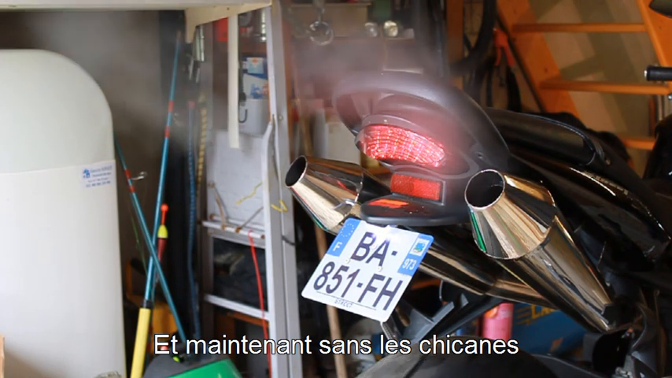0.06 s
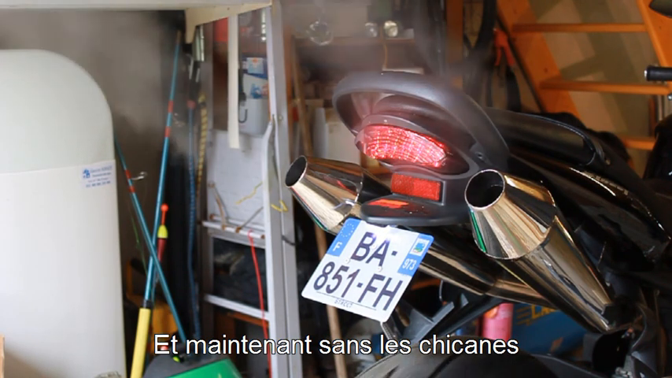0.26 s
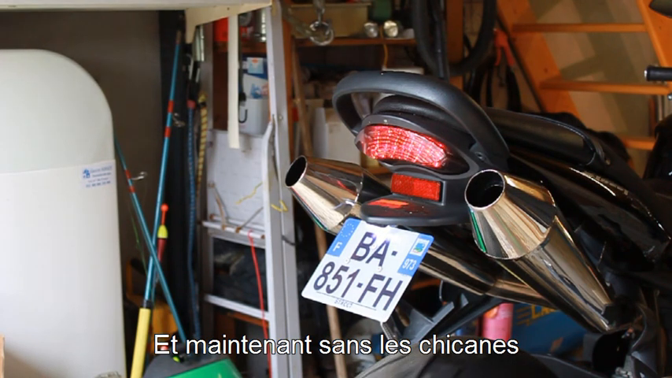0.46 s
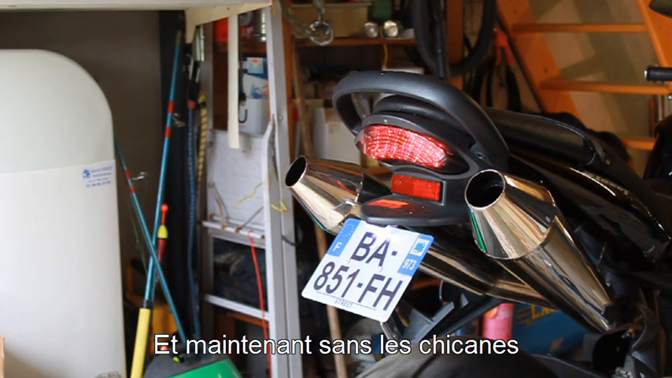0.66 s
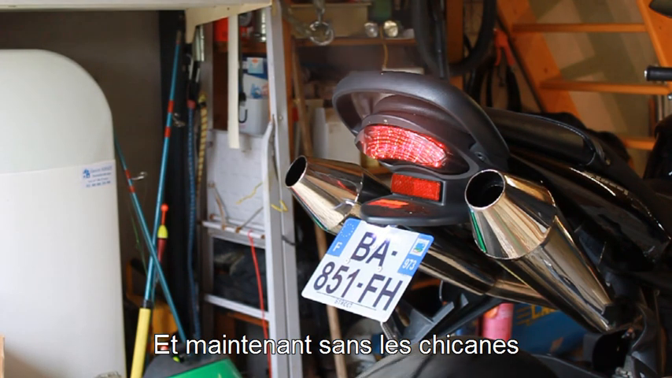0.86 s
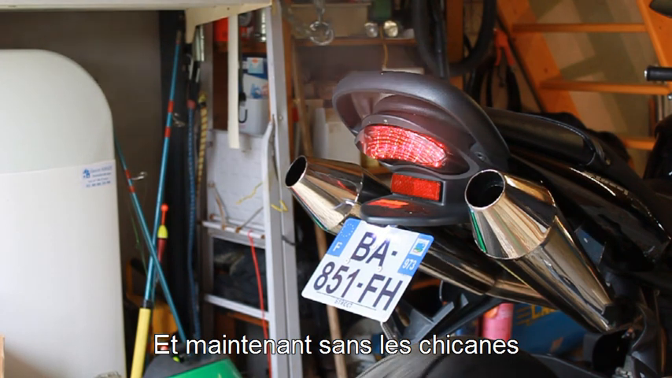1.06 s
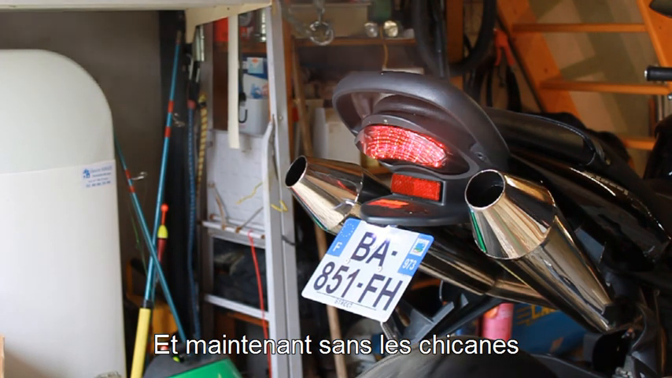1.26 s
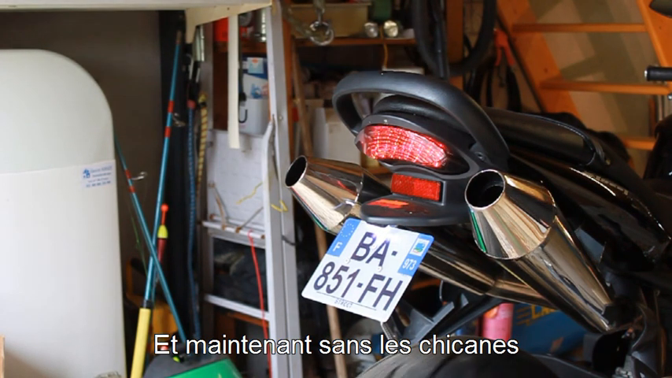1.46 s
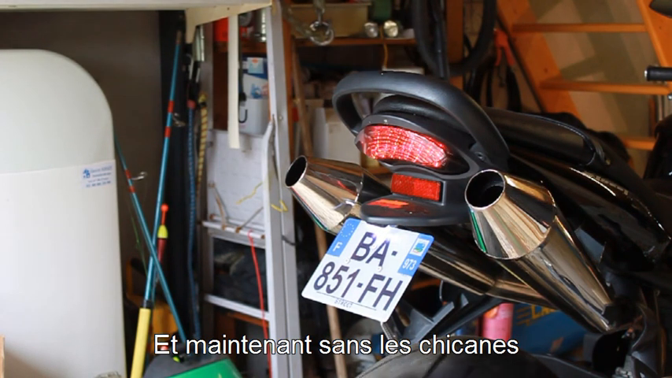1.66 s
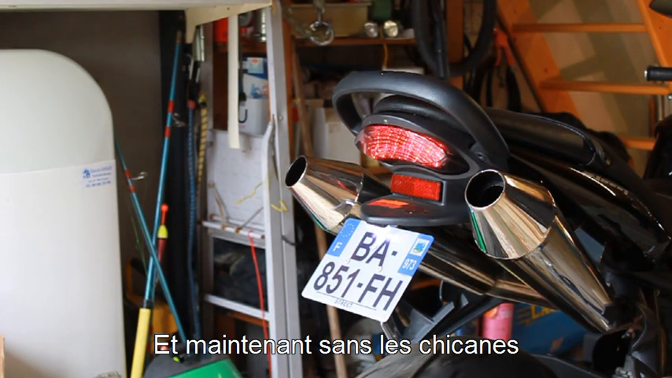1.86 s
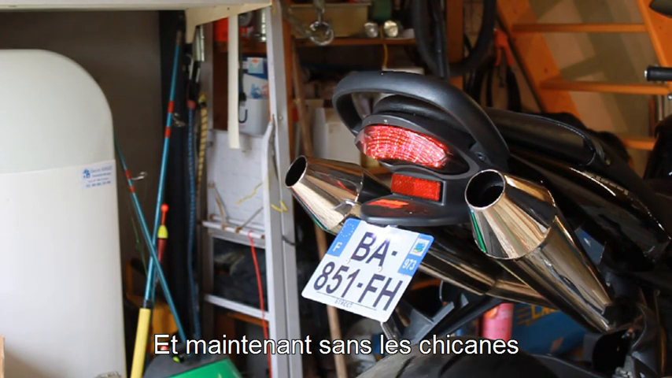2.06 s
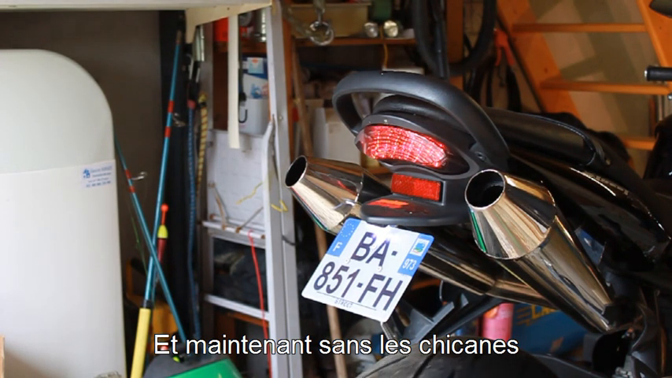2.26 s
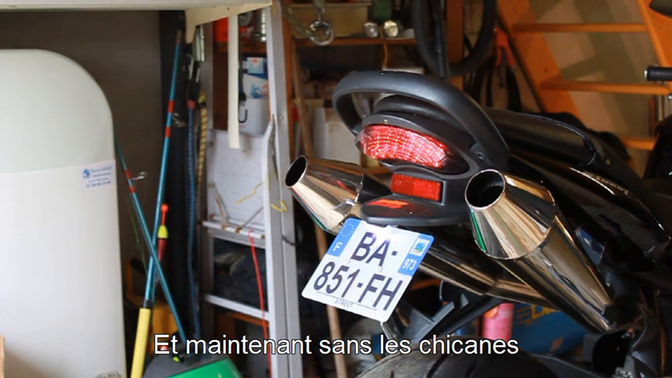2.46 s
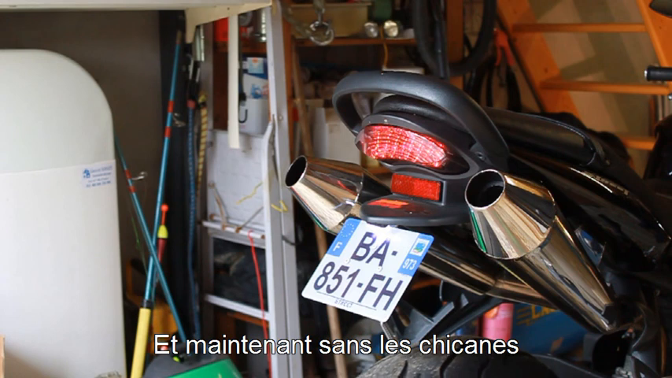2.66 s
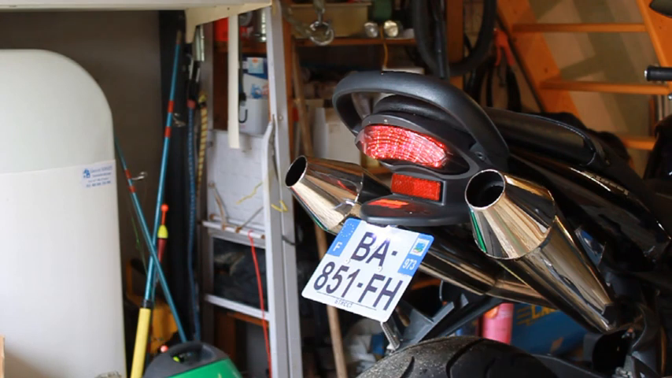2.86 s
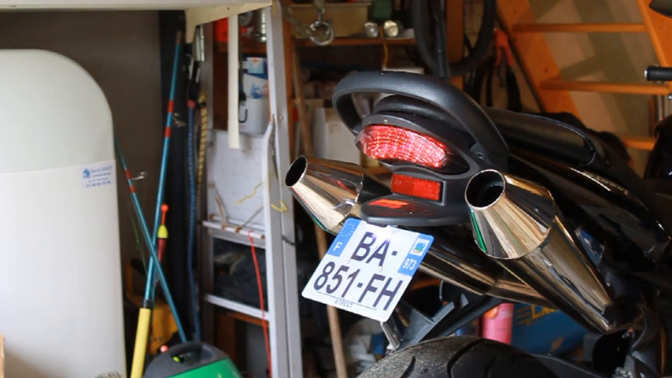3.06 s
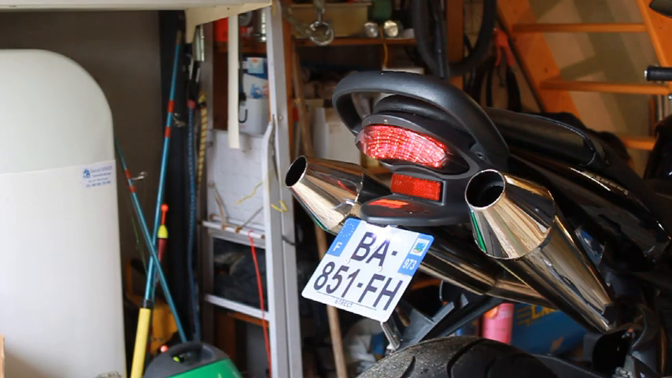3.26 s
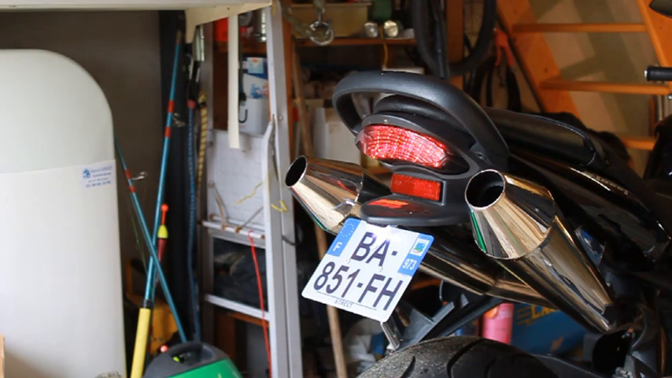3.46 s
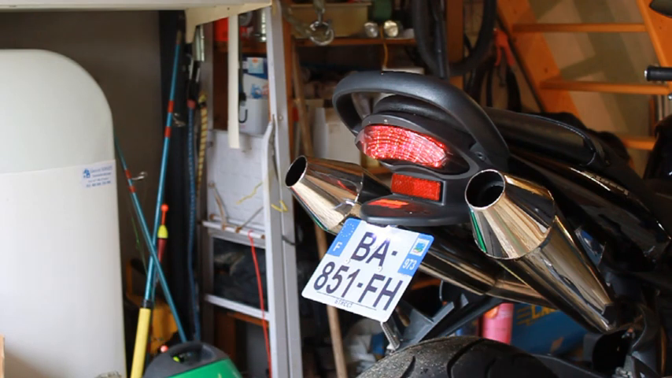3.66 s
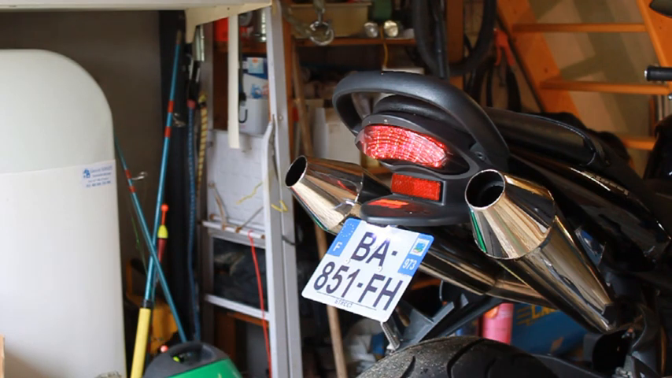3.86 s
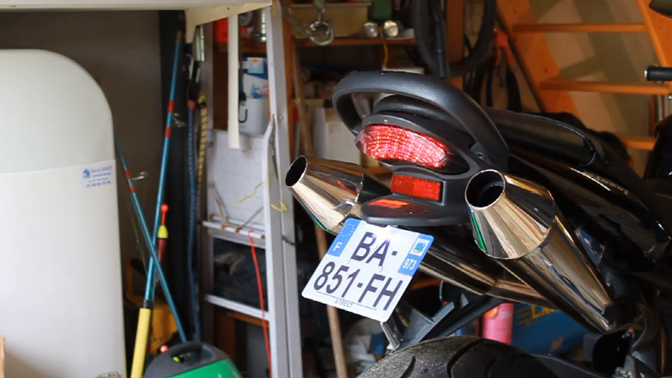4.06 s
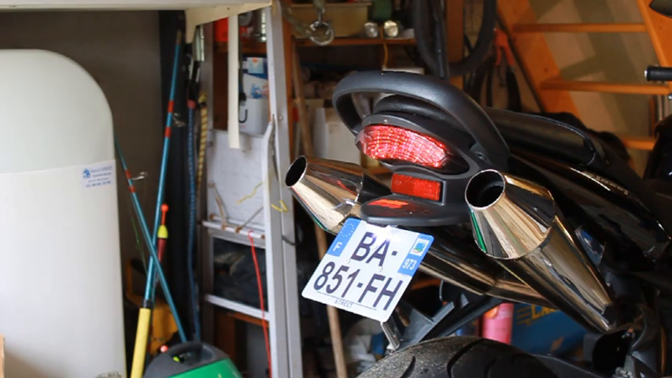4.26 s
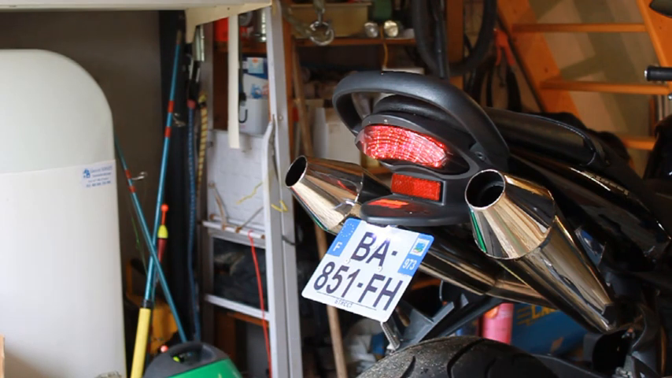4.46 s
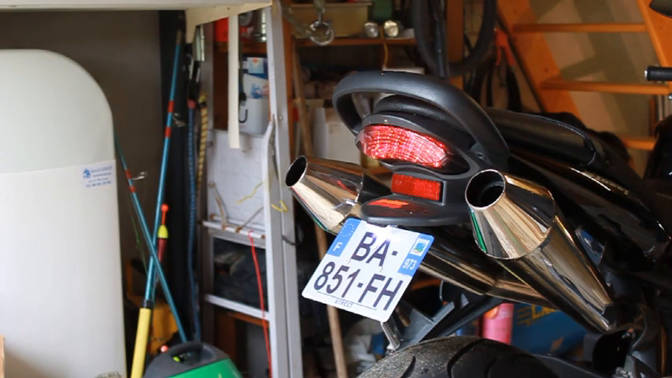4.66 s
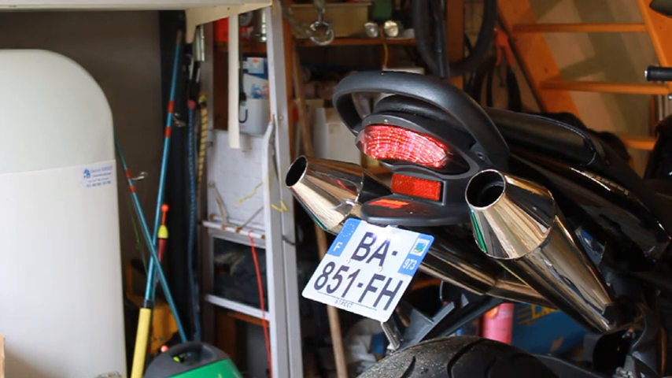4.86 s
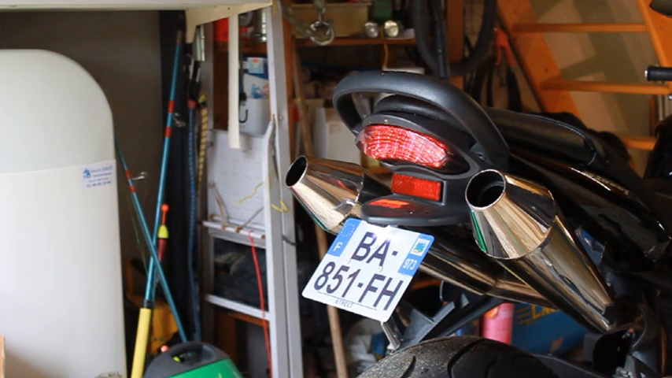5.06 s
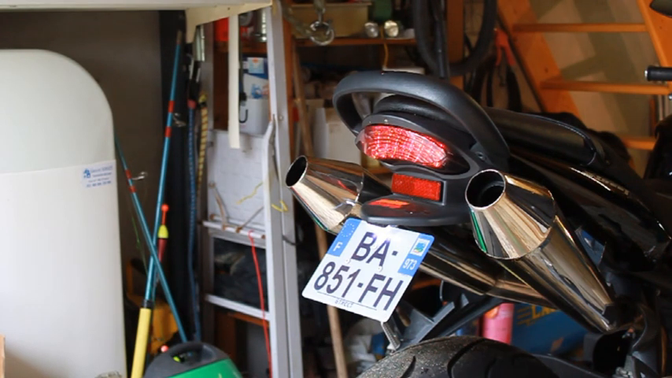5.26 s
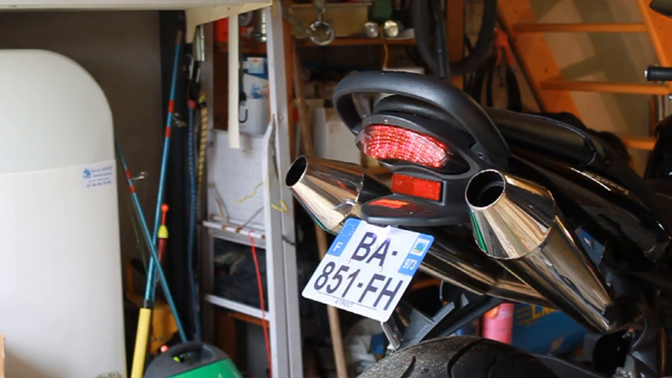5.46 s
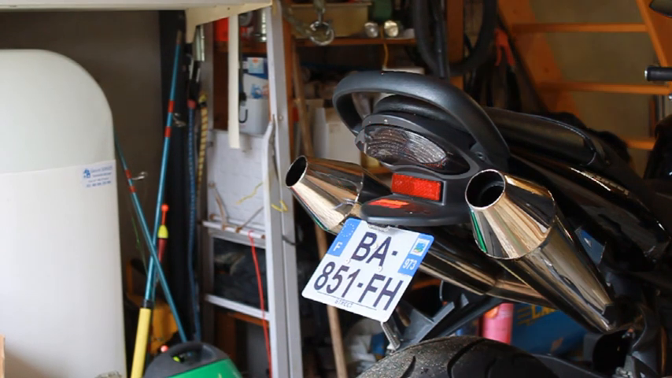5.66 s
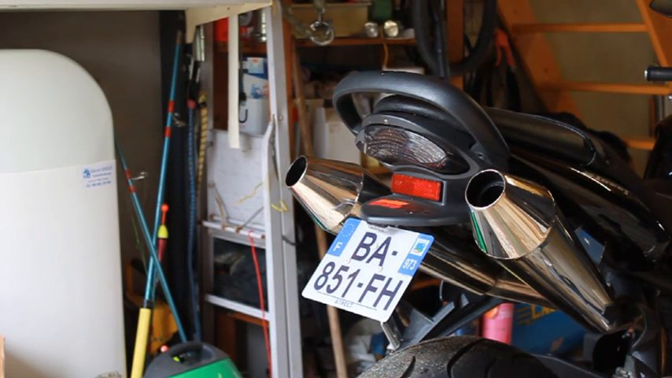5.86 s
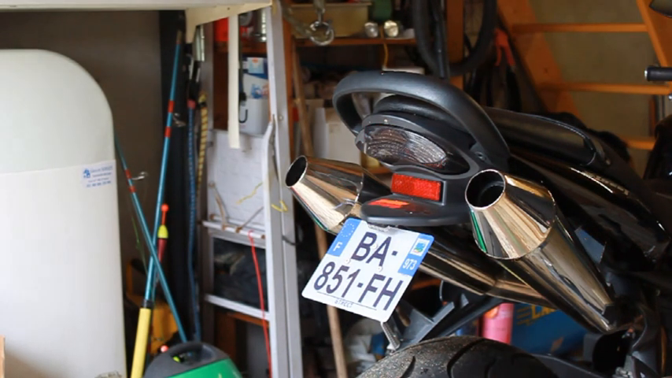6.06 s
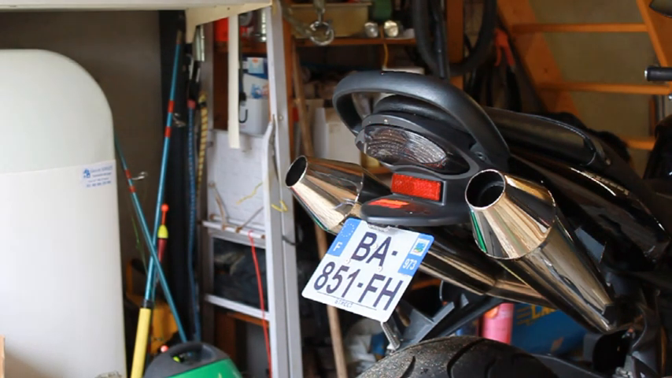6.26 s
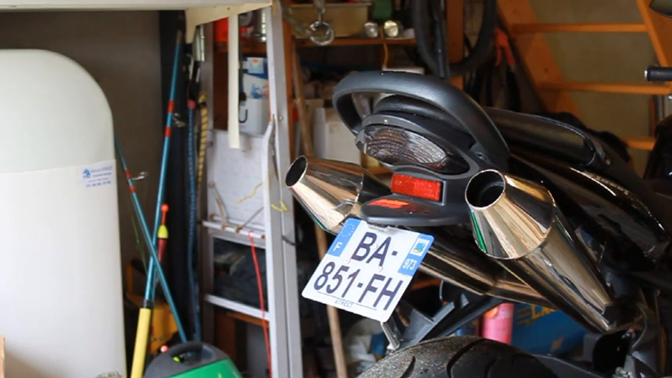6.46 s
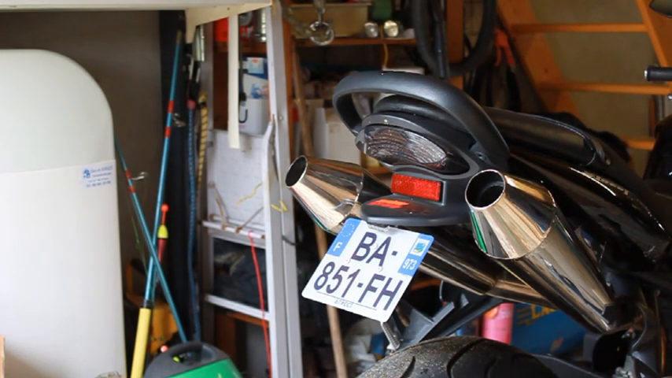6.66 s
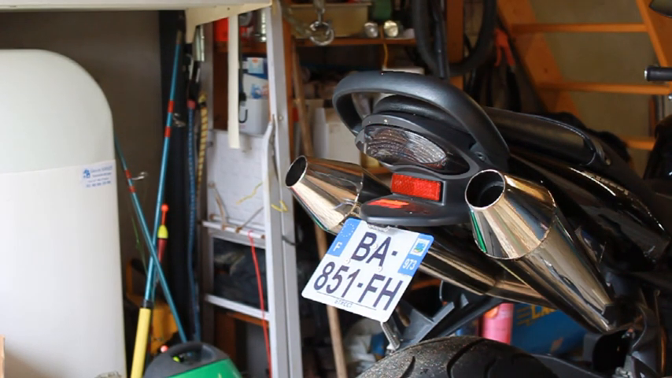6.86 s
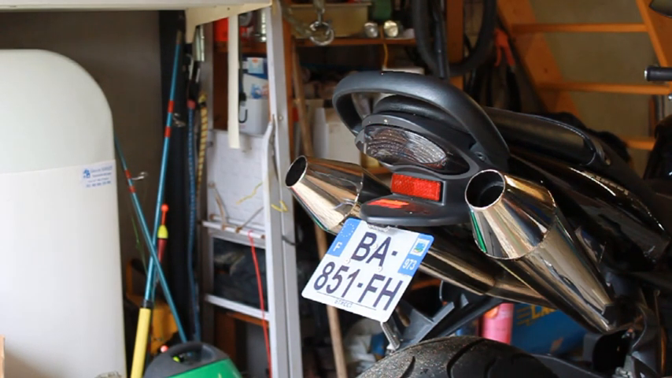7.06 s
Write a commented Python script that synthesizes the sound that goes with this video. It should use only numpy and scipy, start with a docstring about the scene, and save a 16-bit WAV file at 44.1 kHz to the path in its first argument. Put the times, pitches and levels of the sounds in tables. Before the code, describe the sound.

Close behind a three-cylinder motorcycle in a reverberant garage, a falling rev is blipped up to a loud, raspy saw-like howl. The note sinks, backfires snap in the open pipes, and separate pulses settle into a deep hunting idle with hissing gas and gear whine. The ignition is cut, the drive clatters briefly, then soft cloth rustle and a tiny tap in near silence. A small microphone saturates on peaks.

```python
"""A three-cylinder motorcycle with open pipes revs up in a garage: its firings merge into a saw-like note.
The speed falls, backfires pop in the pipes, and single exhaust pulses burble down to a hunting idle.
Rushing gas (shaped noise) and meshing gears (narrow noise bands) follow the speed. The ignition is cut,
the drive clatters (decaying noise) as the crank stops; then cloth rustles and something small is set down
in the quiet garage, over a faint hum of narrow resonances."""
import sys
import numpy as np
from scipy import signal
from scipy.fft import rfft, irfft
from scipy.io import wavfile
from scipy.ndimage import uniform_filter1d

SR = 44100
rng = np.random.default_rng(int(sys.argv[2]) if len(sys.argv) > 2 else 0)


def materialize(psi):
    """Save the field psi as 16-bit PCM at rate SR to the path in sys.argv[1].

    A 1-D psi becomes a single channel; in a 2-D psi each row is a channel.
    """
    bounded = np.clip(np.atleast_2d(psi).T, -1, 1)
    quanta = np.round(bounded * 32767).astype(np.int16)
    wavfile.write(sys.argv[1], SR, quanta)


N = 313530
T = np.arange(N) / SR  # time (s)

# The idle speed hunts a little. Each row: time [s], firing rate [firings per s].
IDLE_SPEED = [(2.1, 35.4), (2.23, 34.2), (2.34, 35.2), (2.46, 34.5), (2.75, 34.5), (2.99, 35.3),
              (3.11, 34.8), (3.23, 35.9), (3.65, 34.4), (3.73, 35.6), (3.85, 35.9), (3.97, 35.0),
              (4.21, 35.0), (4.3, 34.5), (4.53, 34.7), (4.61, 35.3), (4.85, 35.8), (4.97, 35.0),
              (5.14, 34.7), (5.28, 35.4), (5.4, 33.9), (5.44, 34.1), (5.53, 36.2), (5.62, 36.4)]
IDLE_HZ = 35  # reference firing rate at idle
OFF_S, STILL_S = 5.62, 5.8  # ignition cut; crank at rest


def amp(db):
    """Level in decibels to amplitude ratio."""
    return 10 ** (np.asarray(db) / 20)


def evened(x):
    """Normalisation to unit root-mean-square."""
    return x / np.sqrt(np.mean(x ** 2) + 1e-20)


def read(points, hz):
    """Interpolation of a spectrum along a logarithmic frequency axis."""
    f, value = np.transpose(points)
    return np.interp(np.log(hz + 1), np.log(f + 1), value)


def curves(*tables):
    """Piecewise linear time courses of the columns after the time column."""
    s, *columns = np.transpose(np.vstack(tables))
    return [np.interp(T, s, c) for c in columns]


def bumps(rows):
    """Sum of Gaussian bells from rows of (time s, length s, height)."""
    return sum(height * np.exp(-(2 * (T - s) / length) ** 2) for s, length, height in rows)


def resonate(x, hz, width):
    """Resonance of peak gain 1 by heterodyning: shifts hz down to zero, smooths, shifts back."""
    turn = np.exp(2j * np.pi * np.cumsum(hz * np.ones(len(x))) / SR)
    r = np.exp(-np.pi * width / SR)
    return 2 * (turn * signal.lfilter([1 - r], [1, -r], x / turn)).real


def noise(spectrum):
    """Stationary noise: white noise weighted by a spectral density."""
    weight = amp(read(spectrum, np.fft.rfftfreq(N, 1 / SR)))
    return evened(irfft(rfft(rng.standard_normal(N)) * weight, N))


def flutter(size):
    """Slow random modulation: white noise averaged over a number of samples."""
    return evened(uniform_filter1d(rng.standard_normal(N), size=size))


def clicks(rows):
    """Unit impulses scaled by level, from rows of (time s, level dB)."""
    x = np.zeros(N)
    s, db = np.transpose(rows)
    x[(s * SR).astype(int)] = amp(db)
    return x


def colour(x, points):
    """Minimum-phase filter: the phase is the Hilbert transform of the log gain."""
    log_gain = np.log(amp(read(points, abs(np.fft.fftfreq(2 ** 14, 1 / SR)))))
    response = np.exp(log_gain - 1j * signal.hilbert(log_gain).imag)
    taps = np.fft.ifft(response).real[:2 ** 12]
    return signal.oaconvolve(x, taps / np.linalg.norm(taps))[:N]


def swept(x):
    """Dispersion: group delay rises with pitch, so each stroke sweeps upward."""
    hz = np.fft.rfftfreq(N, 1 / SR)
    late = .011 * np.minimum(hz / 400 - .5, 1)  # s; level above 600 Hz
    return irfft(rfft(x) * np.exp(-2j * np.pi * np.cumsum(late) * hz[1]), N)


def quiet():
    """Room background: friction noise of cloth, a hum of narrow resonances, a noise floor, a steady noise wash."""
    # Cloth rustling near by. Each row: time in seconds, length in seconds, level in dB.
    rustles = [(6.328, 0.027, -65.5), (6.4, 0.073, -63), (6.523, 0.092, -57.5), (6.96, 0.076, -61),
               (7.02, 0.041, -64), (7.072, 0.06, -55)]
    # Spectrum of the rustle. Each row: frequency in Hz, relative density in dB per Hz.
    rustle_colour = [(30, -24), (100, -12), (400, 4.5), (1000, -4), (3000, -5), (8000, -14), (16000, -13)]
    # Partials of the hum. Each row: frequency in Hz, relative level in dB.
    hum_partials = [(226.1, -71), (360.7, -70), (403.7, -72), (586.8, -66), (672.9, -70), (1039, -77),
                    (1400, -84)]
    # Spectrum of the noise floor. Each row: frequency in Hz, relative density in dB per Hz.
    floor_colour = [(20, -2.5), (60, -5), (300, -14), (1500, -12.5), (16000, -38.5)]
    bed_db, floor_db = -68, -68
    # steady noise wash with the rustle's colour: constant level until 5.85 s, then dying away
    wash_db, wash_dies_s, wash_db_per_s = -44.5, 5.85, -150
    hum_db, hum_from_s, hum_rise_s = -60.5, 6.7, 0.085

    rustle = amp(bed_db) + bumps([(s, length, amp(db)) for s, length, db in rustles])
    rustle += amp(wash_db + wash_db_per_s * np.maximum(T - wash_dies_s, 0))
    swell = amp(hum_db) / (1 + np.exp((hum_from_s - T) / hum_rise_s))
    hum = sum(amp(db) * evened(resonate(rng.standard_normal(N), hz, 4.7)) for hz, db in hum_partials)
    return rustle * noise(rustle_colour) + swell * evened(hum) + amp(floor_db) * noise(floor_colour)


def garage(x):
    """Diffuse reverberation: a noise tail whose bands decay exponentially, each at its own speed."""
    # Reverberation of the garage. Each row: frequency in Hz, time to fall by 60 dB in seconds.
    decay_times = [(100, 0.75), (500, 0.68), (2000, 0.37), (8000, 0.44)]
    hz, t, z = signal.stft(rng.standard_normal(SR), SR, nperseg=256)
    decay = amp(-60 * t / read(decay_times, hz)[:, None])
    tail = signal.istft(z * decay, SR, nperseg=256)[1]
    return signal.oaconvolve(x, tail / np.linalg.norm(tail))[:N]


def clatter():
    """Impact excitation: slack in the drive knocks the casing, a bright crack and a short jangle each."""
    # Backlash blows. Each row: time in seconds, relative level in dB.
    blow_rows = [(5.808, -20), (5.813, -1.5), (5.829, -35), (5.844, -15), (5.859, -12), (5.88, -11),
                 (5.894, -22), (5.909, -43)]
    # Something small is set down. Each row: time in seconds, relative level in dB.
    tap_rows = [(7.027, -30)]
    # Spectrum of the casing. Each row: frequency in Hz, relative density in dB per Hz.
    casing_colour = [(250, -30), (800, -14), (1100, -7), (1500, 0), (2600, 0), (3500, -7), (4600, -11),
                     (6000, -19), (10000, -24), (16000, -34)]

    t = np.arange(4000) / SR
    blows = clicks(blow_rows) + clicks(tap_rows)
    jangle_shape = amp(-16.0 - 60 * t / 0.12) * (1 - np.exp(-t / 0.0039))
    jangle = signal.oaconvolve(blows, jangle_shape)[:N] * noise(casing_colour)
    jangle *= amp(2.2 * flutter(90))  # loose parts chatter
    crack_shape = amp(-27 - 60 * t / .05) * (1 - np.exp(-t / .003))
    crack = signal.oaconvolve(blows, crack_shape)[:N]
    return jangle + crack * rng.standard_normal(N)


def gears(rate, cycles):
    """Mesh tones: fuzzy whines at multiples of the firing rate, amplitude-modulated by the firings."""
    # Level of the whine. Each row: time in seconds, level in dB.
    whine_levels = [(0, -32), (.2, -32), (.3, -44), (.85, -40), (1, -30), (1.25, -28.5), (1.5, -29.5),
                    (1.7, -32), (1.9, -33), (2.05, -40), (3, -39), (5.55, -39), (5.63, -37), (5.7, -40),
                    (5.8, -56)]
    # Gear and chain mesh. Each row: multiple of the firing rate, nominal width in Hz,
    # relative level at speed in dB, relative level at idle in dB.
    mesh = [(24.38, 16, -30, -6), (31.45, 38, -3.5, -0.5), (42.5, 30, -36.5, -13), (57.54, 28, -19, -6),
            (61.7, 61, -11, -5), (67.1, 43, -29, -6), (91.7, 84, -24, -11)]

    whine_db, = curves(whine_levels)
    fast = np.clip((rate - 38) / 8, 0, 1)  # 0 at idle, 1 at speed
    whine = 0
    for multiple, width, fast_db, idle_db in mesh:
        waver = .012 * fast * flutter(200)
        hz = rate * multiple * (1 + waver)
        spread = width * np.sqrt(np.pi / 2)
        grains = signal.lfilter([1], [1, -np.exp(-np.pi * spread / SR)], rng.standard_normal((2, N)))
        angle = 2 * np.pi * np.cumsum(hz) / SR
        line = evened(grains[0] * np.cos(angle) + grains[1] * np.sin(angle))
        treble_fade = np.clip(3 - hz / 3500, 0, 1)  # from 7 to 10.5 kHz
        whine += amp(idle_db + fast * (fast_db - idle_db)) * line * treble_fade
    throb = evened(7.8 + np.cos(np.pi * cycles) ** 2)
    return amp(whine_db) * whine * throb * (T < STILL_S)


def roar(rate, cycles):
    """Turbulent flow noise: gas rushes out in a puff with each firing and tears in bursts at speed."""
    # Spectra of the gas at speed and at idle. Each row: frequency in Hz, relative density in dB per Hz.
    speed_colour = [(180, -31.5), (300, 0.5), (593, -10), (762, -6), (856, -9.5), (1970, -8), (2400, -5),
                    (4370, -10), (13800, -24.5), (16000, -15.5)]
    idle_colour = [(250, 5.5), (450, 2), (700, -2), (1300, -7.5), (2300, 0), (3900, -6), (8000, -17.5),
                   (16000, -17.5)]
    # The roar dips or leaps briefly. Each row: time in seconds, length in seconds, change in dB.
    lulls = [(.34, 0.12, -3), (.464, 0.045, -6), (.51, 0.0092, -9.5), (.62, 0.015, 13), (.79, 0.013, -5),
             (.924, 0.046, -4), (1.1, .03, 0)]
    base_db, db_per_octave, lag_s = -36, 6.5, 0.034  # follows the speed, a little late
    settled_s, dip_db, regain_s = 1.8, -5, 0.74  # dips as idle nears and creeps back
    dies_db_per_s = -170  # after the ignition cut

    lagging = np.interp(T - lag_s, T, rate)
    roar_db = base_db + db_per_octave * np.log2(lagging / IDLE_HZ) + bumps(lulls)
    roar_db += dip_db * np.exp(-abs(T - settled_s) / regain_s)
    roar_db += dies_db_per_s * np.maximum(T - OFF_S, 0)
    puffs = evened(1.6 + np.cos(np.pi * cycles) ** 4)
    fast = np.clip((rate - 45) / 90, 0, 1)
    gas = np.sqrt(fast) * noise(speed_colour) + np.sqrt(1 - fast) * noise(idle_colour)
    bursts = flutter(700) + .3 * flutter(3000)
    crackle_db = (1.2 + 2.3 * np.clip((rate - 150) / 100, 0, 1)) * bursts
    return (T < STILL_S) * puffs * amp(roar_db + crackle_db) * gas


def note(rate, cycles):
    """Harmonic synthesis: at high revs the pulses merge into a saw-like tone that rasps under load."""
    # Load. Each row: time in seconds, throttle opening from 0 to 1.
    throttle = [(.25, .15), (.28, 1), (.6, 1), (.68, .15)]
    # First three harmonics. Each row: relative level in dB, dB added at full throttle.
    harmonics = [(-11, -1), (-20.5, 5), (-28.5, 2.5)]
    # Colour of the note. Each row: frequency in Hz, relative gain in dB.
    note_colour = [(95, -20), (140, -14.5), (170, -9), (210, -4.5), (300, -2.5), (400, 4.5), (520, -12),
                   (620, -6), (900, -5.5)]
    # Standing waves of pipes and garage swallow the note as it sweeps past.
    # Each row: frequency in Hz, width in Hz, share lost from 0 to 1.
    dead_spots = [(192, 16, 1), (243, 14, .95), (272, 12, .95), (299, 8, .8), (310, 6, .8), (351, 18, .9),
                  (366, 8, .8), (389, 18, .95), (419, 16, .9), (505, 30, .9), (590, 40, .7)]
    overtones_sink_hz = 145  # firing rate below which the overtones drop, by up to 12 dB
    jitter_cycles = .02  # under load the firings come early or late
    end_s, fade_s = 1.51, 0.21

    loaded, = curves(throttle)
    levels_db = [db + more_db * loaded + read(note_colour, k * rate)
                 for k, (db, more_db) in enumerate(harmonics, 1)]
    sink_db = 12 * np.clip((overtones_sink_hz - rate) / 10, 0, 1)
    levels_db[1:] = [db - sink_db for db in levels_db[1:]]
    cycles = cycles + jitter_cycles * loaded * flutter(400)
    rasp = loaded * flutter(150)
    tone = sum(amp(db) * np.sin(2 * np.pi * k * cycles) * (1 + .3 * (k - .7) * rasp)
               for k, db in enumerate(levels_db, 1))
    # harmonics 4 to 9, each 2 dB weaker than the one before
    tone += sum(amp(levels_db[2] - 2. * k) * np.sin(2 * np.pi * (k + 3) * cycles) * (0.9 + rasp)
                for k in range(1, 7))
    for hz, width, share in dead_spots:
        tone = tone - np.clip(share, 0, 1) * resonate(tone, hz, width)
    return amp(5.0) * tone * np.clip((end_s - T) / fade_s, 0, 1)


def exhaust(rate, cycles):
    """Pulse train in a resonant pipe: one pressure pulse per firing, uneven, echoing to and fro."""
    # Level of the separate pulses. Each row: time in seconds, relative level in dB.
    pulse_levels = [(0, -60), (.25, -27), (.52, -31.5), (.6, -13.5), (.72, -47), (1.1, -58), (1.2, -34),
                    (1.35, -24), (1.6, -28), (1.9, -27.5), (1.97, -19), (2.038, -31.5), (2.09, -22.5),
                    (2.3, -19.5), (2.9, -19.5), (5.58, -19), (5.63, -33.5), (5.7, -38.5), (5.8, -49)]
    # Ragged on the closed throttle, even at idle. Each row: time in seconds, scatter of firings in dB.
    ragged = [(0, 3), (1.15, 3), (1.2, 4.5), (1.95, 4.5), (2.08, .9), (6, .9)]
    # One entry per cylinder: level offset in dB.
    cylinder_db = [1.1, -.9, -.2]
    # Backfires in the pipes on the closed throttle. Each row: time in seconds, relative level in dB.
    pops = [(1.18, -6), (1.206, -5.5), (1.264, -2.5), (1.28, -6.5), (1.36, -4.5), (1.446, 2), (1.464, -5),
            (1.488, -6), (1.509, -6.5), (1.68, -25), (1.838, -25), (1.915, -27.5), (1.965, -29)]
    # Colour of the pipes. Each row: frequency in Hz, relative gain in dB.
    pipe_colour = [(20, -76), (35, -42), (70, -4), (105, 4), (140, 3.5), (175, 4.5), (210, 7), (245, 7),
                   (280, 5.5), (315, 2), (385, -2), (420, -7.5), (460, -44.5), (600, -45.5), (1000, -53),
                   (3000, -73)]
    surge_db_per_hz, boom_per_hz = .8, .45  # pulses grow and boom when the idle runs fast
    lap_s, share = .009, .42  # round trip in the pipe; share that leaves at once
    wall_s, wall_db = .0195, -13  # echo of the wall behind

    (pulse_db,), (scatter_db,) = curves(pulse_levels), curves(ragged)
    surge = (rate - IDLE_HZ) * (T > IDLE_SPEED[0][0]) * (T < OFF_S)
    pulse_db = pulse_db + surge_db_per_hz * surge
    late, luck, bite = np.clip(rng.standard_normal((4000, 3)), -2, 2).T  # one row per firing
    jittered = cycles + .005 * late[(cycles + .5).astype(int)]
    firing = np.maximum.accumulate(jittered).astype(int)
    uneven_db = scatter_db * luck[firing] + np.array(cylinder_db)[firing % 3]
    strength = amp(pulse_db + uneven_db) * (T < STILL_S)
    pulses = np.diff(firing, prepend=0) * strength * np.sqrt(SR / rate)  # equal power at any speed
    pulses += resonate(.18 * bite[firing] * pulses, 300, 200)  # some firings are sharper
    pulses += resonate(boom_per_hz * surge * pulses, 235, 90)

    drive = amp(-0.5) * pulses + amp(15.0) * clicks(pops)
    gap = np.zeros(round(lap_s * SR) - 1)
    drive = signal.lfilter(np.r_[share, gap, 1], np.r_[1, gap, share], drive)  # all-pass echo
    drive = drive + amp(wall_db) * np.roll(drive, round(wall_s * SR))
    snap_shape = amp(-13.5 - 60 * T[:4000] / 0.13)
    snaps = signal.oaconvolve(clicks(pops), snap_shape)[:N]  # the backfires also snap
    return resonate(snaps * rng.standard_normal(N), 740, 670) + swept(colour(drive, pipe_colour))


def scene():
    """Superposition: one engine speed drives the engine's sources, and the garage reverberates."""
    # Speed through the rev and down to idle. Each row: time in seconds, firing rate in firings per second.
    rev_speed = [(0, 210.3), (.066, 202.5), (.134, 186.1), (.2, 174.5), (.278, 150.2), (.36, 184),
                 (.44, 244.3), (.528, 307.8), (.576, 316.6), (.62, 307), (.71, 274), (.83, 246),
                 (.938, 206.2), (1.01, 186.6), (1.09, 172), (1.134, 160.6), (1.178, 143), (1.318, 119.3),
                 (1.5, 87), (1.7, 63.5), (1.96, 39.5), (2.06, 36.3)]
    last_hz = 17  # firing rate as the crank comes to rest
    rate, = curves(rev_speed, IDLE_SPEED, [(STILL_S, last_hz)])
    cycles = np.cumsum(rate) / SR  # firings so far
    hiss = roar(rate, cycles) + gears(rate, cycles) + clatter()
    low = exhaust(rate, cycles)
    echo = amp(-6.0) * garage(hiss) + amp(-17) * garage(low)
    return (note(rate, cycles) + low + hiss + echo + quiet())[None]


def record(dry):
    """Transducer limits: a small microphone drops deep bass, saturates on peaks and is band-limited."""
    edge_hz, ceiling = 15620, .52
    thin = signal.sosfilt(signal.butter(2, 40., "high", fs=SR, output="sos"), dry)
    squashed = thin / (1 + abs(thin / ceiling) ** 4) ** .25
    lowpass = signal.firwin(1023, edge_hz, window=("kaiser", 9), fs=SR)
    return signal.oaconvolve(squashed, lowpass[None], "same")


dry = scene()
out = record(dry)
materialize(out)
```